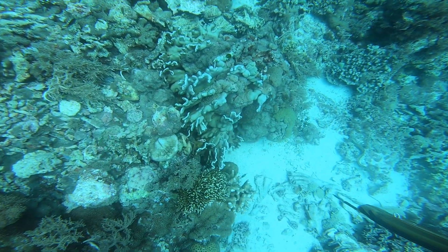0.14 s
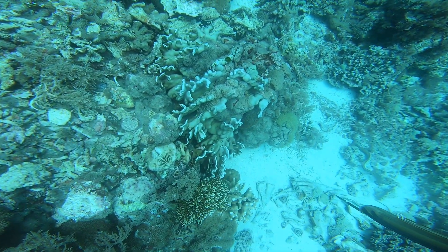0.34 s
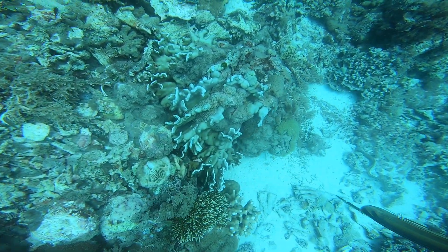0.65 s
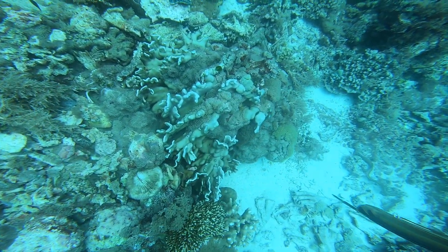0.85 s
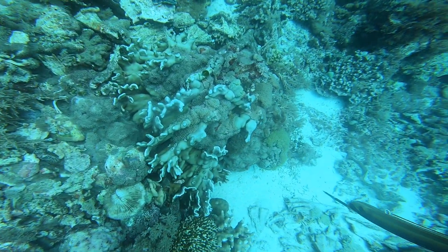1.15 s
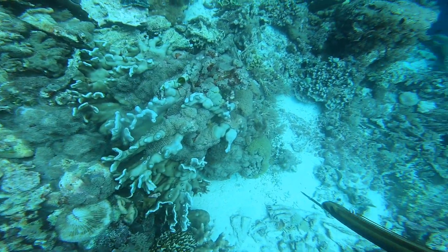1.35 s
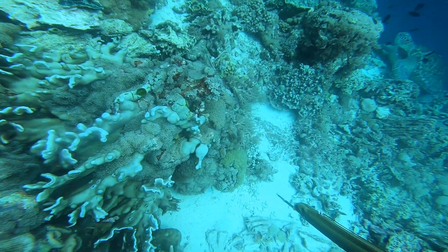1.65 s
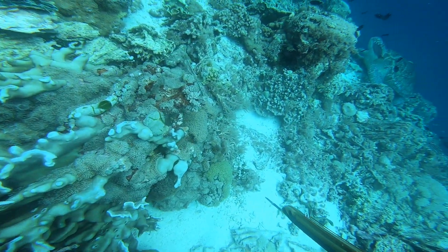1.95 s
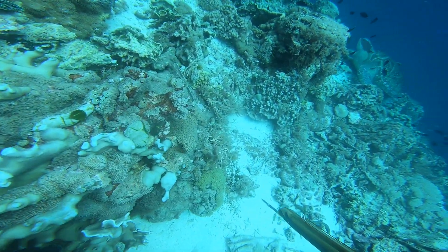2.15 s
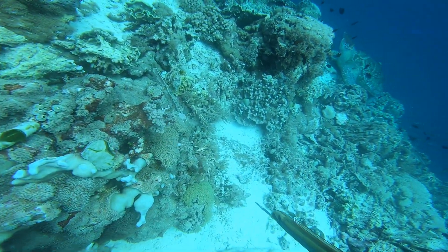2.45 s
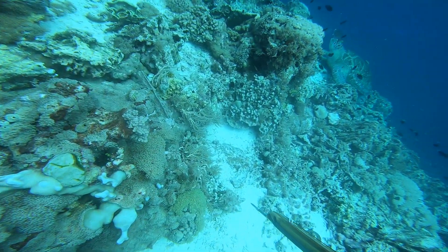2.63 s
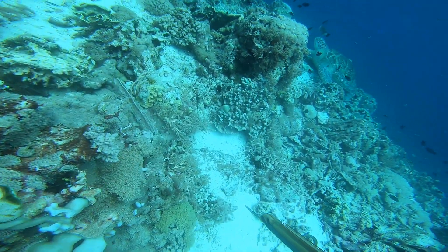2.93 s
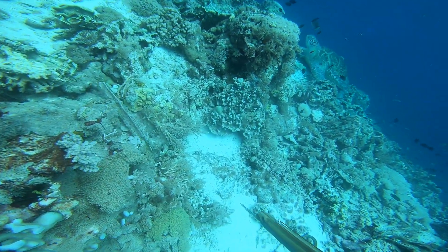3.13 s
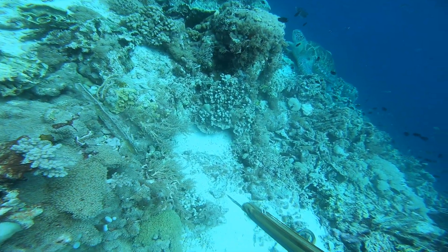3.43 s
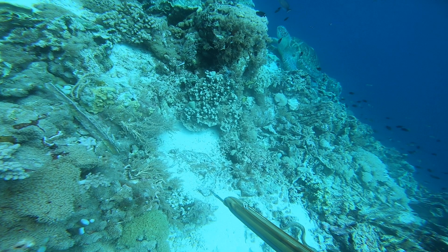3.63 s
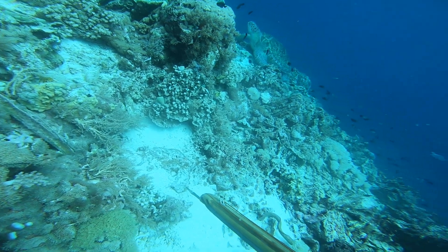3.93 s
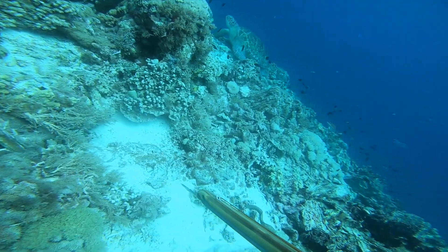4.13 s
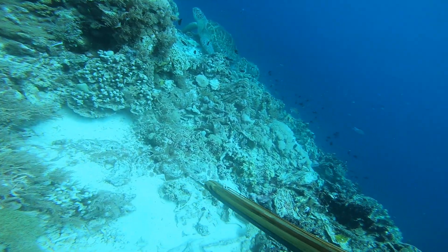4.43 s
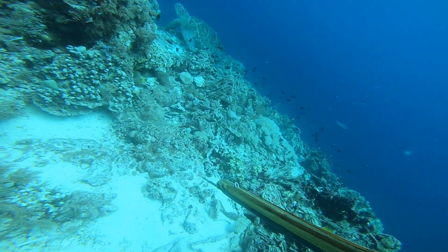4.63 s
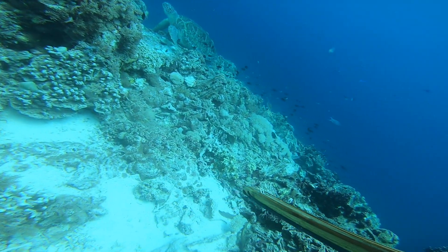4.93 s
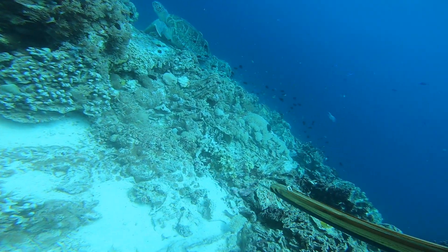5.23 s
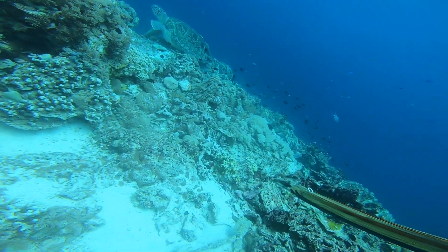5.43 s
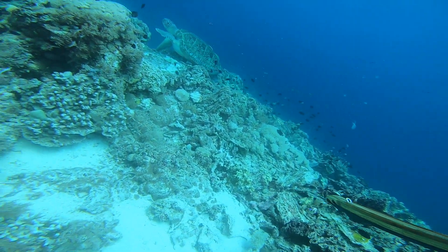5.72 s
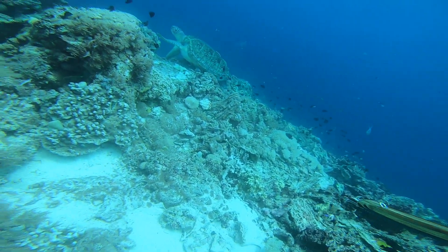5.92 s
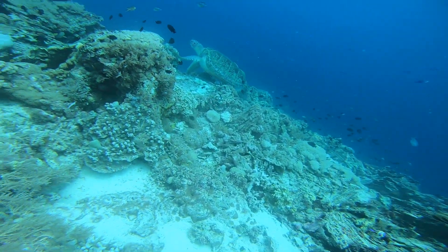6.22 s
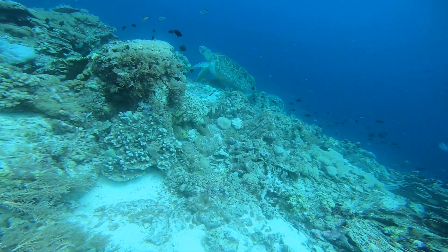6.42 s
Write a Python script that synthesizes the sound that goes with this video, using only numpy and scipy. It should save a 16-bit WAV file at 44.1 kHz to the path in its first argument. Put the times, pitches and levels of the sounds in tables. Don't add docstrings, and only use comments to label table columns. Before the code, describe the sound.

Underwater over a coral reef, dense sharp clicks and crackles pop constantly above a low, soft rumble of moving water.

```python
import sys
import numpy as np
from scipy import signal
from scipy.fft import rfft, irfft, next_fast_len
from scipy.io import wavfile
from scipy.ndimage import uniform_filter1d

SR = 44100
rng = np.random.default_rng(int(sys.argv[2]) if len(sys.argv) > 2 else 0)


def undo_db(level):
    steps = np.asarray(level, float) / 20
    return 10 ** steps


def master_out(mix):
    frames = np.transpose(np.atleast_2d(mix))
    ceiling = np.clip(frames, -1, 1)
    pcm = np.round(ceiling * 32767).astype(np.int16)
    wavfile.write(sys.argv[1], SR, pcm)


N = 289737

# t/s, peak level at 2
# kHz/dB, relative level near 3, 5 and 9 kHz/dB
LOUD_SNAPS = [(0.0107, -23.5, -9.5, -0.5, -13), (0.203, -24, -13, -23, -11), (0.2058, -28, -21, -23, -24),
              (0.2141, -25, -8, 1, -16), (0.4993, -18.5, -10.5, -7, -7.5), (0.9912, -22.5, -24, -0.5, -20),
              (0.9949, -18.5, -16, -4.5, -13), (1.0256, -18.5, -13, -14, -11.5),
              (1.0307, -19.5, -17, -8.5, -8.5), (1.201, -31.5, -20, 5, 9.5), (1.248, -11.5, -14, -15, -12),
              (1.5191, -31, -12, 4, 5.5), (1.891, -18.5, -42, -21, -10), (1.896, -14.5, -43, -8.5, -13.5),
              (2.0873, -25.5, -1, 1, 11.5), (2.7404, -26, -4.5, 5, 12.5), (3.4778, -20, 1, 0, -7.5),
              (3.4875, -30, -4, 5.5, 2), (4.8795, -27, -0.5, 4, -38), (5.246, -18.5, -11, -6, -41),
              (5.2556, -22.5, -11, -1, -35), (5.628, -16.5, -5, -6.5, -1), (5.7957, -27, -0.5, 8.5, -21),
              (6.4737, -23, 3.5, 5.5, 2)]
LOUD_LEAN_DB = [1.5, 0.1, 0.1, -3, 9, -1, 0, 0.1, 2, -2, -2, 4, 4.5, 18, 6, 6, -1.5, -4, -3, -6, -10, 13,
                -6, -5]
# t/s, peak
# level at 2 kHz/dB, relative level near 3 kHz/dB, near 5 kHz/dB
LARGE_CLAWS = [(0.017, -27.5, -25, -10), (0.0831, -31.5, -7, -9), (0.1985, -33, -4, -3),
               (0.352, -31, -4, -17), (0.4083, -32, -11, -28), (0.6077, -40.5, 14, -1),
               (0.6644, -33.5, -11, 3), (0.7824, -33, -3.5, -11), (0.982, -30, -14, -2),
               (1.083, -28.5, -6, 1.5), (1.2436, -27.5, -10, -20), (1.3304, -34.5, 7.5, -3),
               (1.747, -32, -11, 3), (1.866, -30, -13, 1.5), (3.316, -32, -18, 0.5),
               (3.4623, -29.5, -7, -5), (3.5318, -35, -8, 4), (3.9089, -24, -22, -22),
               (4.1995, -30, -24, 4.5), (4.2482, -31.5, -12, 7.5), (4.35, -32.5, -7, -17),
               (4.716, -30.5, -10, 1.5), (4.8739, -32, -2, -3), (5.0446, -32, -7, 4),
               (5.375, -28, -13, -19), (5.6665, -26.5, -10, -1), (5.8053, -32, -4, 12),
               (5.8732, -29, -3, 6), (6.4537, -29, -16, -5), (6.483, -25.5, -19, 1)]
# t/s, peak level at 2 kHz/dB, brightness near 5 and 9 kHz/dB
SMALL_CLAWS = [(0.03, -40, 9.5), (0.2799, -41, 4), (0.552, -40, 5.5), (0.5874, -44, 10), (1.3506, -45, 9),
               (1.3723, -32, 1.5), (2.1689, -34, -1), (2.293, -43, -1), (2.5024, -40, 6.5),
               (2.637, -33, -0.5), (3.022, -50.5, 14), (3.23, -38.5, 4), (3.509, -40, 4), (3.93, -45.5, 12),
               (4.119, -33, 3.5), (4.155, -42, 4), (4.4438, -35.5, 6.5), (4.5445, -38, 2),
               (4.661, -40.5, 2.5), (4.784, -39, 9), (5.2822, -38.5, 5), (5.471, -39.5, 7),
               (5.638, -36, -2), (5.8637, -31, 1.5), (6.042, -50, 13), (6.093, -55, 16),
               (6.1159, -47, 13.5), (6.2422, -46, 13.5), (6.3503, -30, 0), (6.5622, -32.5, 4.5),
               (0.7551, -50, 10.5), (1.2887, -40, 0), (1.5727, -32, -4), (2.5256, -33.5, -0.5),
         (2.8868, -35.5, -1), (3.2741, -40, -4), (3.3486, -49, 12.5), (3.7522, -43, 5), (3.981, -40.5, 4.5),
         (4.9897, -42, 1), (5.2982, -39, 1), (5.4621, -34, -1), (5.8259, -39.5, 2), (6.2288, -45.5, 10)]
# t/s, peak level at 2 kHz/dB, brightness near 5 kHz/dB
LESSER_SNAPS = [(0.1016, -38, -5), (0.1216, -35.5, -1.5), (0.1589, -32, -10), (0.2372, -38, 1),
                (0.3296, -31.5, 0.5), (0.345, -45, -5), (0.3844, -31, -8), (0.4393, -31, -8),
                (0.5352, -49, 16), (0.6515, -49, 16), (0.6958, -34, -2), (0.737, -34.5, -8), (0.7718, -35, 3),
                (0.7876, -35, -3), (0.8461, -37, -16), (0.874, -46.5, 13), (0.9114, -45.5, 15.5),
                (1.0052, -35, 2), (1.0722, -37, -12), (1.1113, -37, 4), (1.1513, -48, 11), (1.1819, -32, -8),
                (1.3078, -38.5, 3.5), (1.3436, -38, 1), (1.3935, -37.5, 2), (1.4573, -48, 15),
                (1.4799, -38.5, 1), (1.5569, -48, 11), (1.7296, -38, 2), (1.7853, -35, -11),
                (1.7919, -38, 2.5), (1.9255, -37.5, 4), (1.9466, -37, -2), (1.9655, -33.5, 1),
                (1.9896, -48, 10), (2.0228, -42.5, 10), (2.0394, -55, 19), (2.1032, -40, -5),
                (2.2114, -50.5, 18.5), (2.2405, -35.5, 2), (2.2673, -33, -11), (2.2964, -35, 2.5),
                (2.3398, -33, -2), (2.6088, -33, -3), (2.7479, -35, 0), (2.7926, -47.5, 14),
                (2.8551, -36, -10), (2.9691, -34.5, -3), (3.0005, -42.5, 8), (3.0668, -42, 4),
                (3.1042, -40.5, 8.5), (3.311, -32, -5), (3.5244, -38, -7),
                (3.7399, -34, -3), (3.7576, -40.5, 6.5), (3.8761, -30, -2.5), (4.1458, -56.5, 24),
               (4.4244, -37, 3), (4.6402, -36.5, 4), (4.9742, -36, 0), (5.01, -31, -5), (5.2271, -36, -8),
               (5.2906, -38, 5), (5.4311, -36.5, 3), (5.5375, -39, -3), (5.5524, -41, -2), (5.5585, -41, 9),
               (5.5744, -28, -9), (5.6576, -34, 1), (5.818, -32, -4), (6.0173, -39, 5), (6.1222, -47, 7),
               (6.2759, -43, 12), (6.28, -32, -2.5), (6.4445, -38, 3), (6.5559, -34, 0)]
# t/s, peak level at 2 kHz/dB, relative level near 5 and 9 kHz/dB
STRAY_SNAPS = [(0.1805, -42.5, 1, 5), (0.3588, -33, -10, -6), (0.4738, -38.5, -6, -10),
               (0.6156, -44, 7, -4), (0.7995, -38, 0, 1), (1.195, -45, 6, 0), (1.3257, -36, -3, -8),
               (1.6129, -49.5, 9, -3), (2.5648, -47, 4, 8), (3.0124, -44, 2, 9), (3.0955, -27.5, -6, -7),
               (3.218, -46, 0, 8), (3.2416, -36, 4, 5), (3.4291, -42.5, 5, -21), (3.5697, -46, 4, 11),
               (4.8953, -38, 1, -15), (5.1595, -54, 6, 16), (5.6183, -50, 8, 16), (5.689, -40, 5, -1),
               (5.8852, -37, 5, -12), (6.34, -42, 5, 8), (6.4331, -48, 4, 17), (1.8644, -42, 6, 5)]
# f/Hz, width/Hz, level/dB
HOUSING = [
    [(1850, 135, -2), (2220, 400, 13.5), (2550, 75, 8)],
    [(3210, 380, 17)],
    [(4010, 210, -1), (5120, 1010, 8), (5900, 280, 11)],
    [(6890, 1450, 2.5), (8680, 720, -0.5), (9550, 1700, -9), (14230, 4000, 2.5)],
    [(886, 70, -9.5), (1157, 89, -6.5), (1314, 42, 18.5)],
]
# lower f/Hz, upper f/Hz
REGION_HZ = [
    (1300, 2480),
    (2490, 3980),
    (3980, 5346),
    (6380, 11340),
    (720, 988),
]
# f/Hz, width/Hz
HOUSING_NULLS = [(1460, 168), (2800, 164), (3700, 61), (6850, 310), (8000, 280)]
# t/s, peak level/dB, f/Hz, length/ms, relative level of the low thump/dB
POPS = [(0.463, -31.5, 402, 4.2, -9.5), (1.137, -31.5, 396, 4.8, -15), (1.748, -44.5, 214, 10.5, -25),
        (1.767, -24.5, 377, 7.3, -18), (2.238, -34.5, 407, 4, -8.5), (2.521, -34.5, 360, 4.4, -9),
        (2.825, -35.5, 371.5, 4.6, -12), (2.881, -27, 428, 4.4, -17), (3.181, -35, 447, 6.6, -4),
        (3.881, -37, 420, 5.7, -18), (4.101, -39.5, 370, 8.4, 0), (4.176, -35, 430, 4, -16),
        (4.351, -38.5, 546, 3.9, -7), (4.413, -37, 381, 7.9, -10), (4.488, -35, 418, 6.1, -9),
        (4.696, -39.5, 397, 4.9, -15), (4.786, -33.5, 405, 5.4, -35), (5.423, -38, 424, 4.4, -21),
        (5.486, -31, 445, 5.4, -4), (5.541, -30, 440, 4.1, -2), (5.6, -31, 450, 5.3, -0.5),
        (5.673, -33, 453, 4.5, -34), (5.719, -32.5, 450, 4.5, -2.5), (6.122, -39, 470, 11, -10)]
# t/s, peak level/dB, f/Hz
FAR_POPS = [(0.22, -43.5, 372), (0.305, -43, 330), (0.439, -43.5, 400), (0.929, -49, 432),
            (1.095, -43, 400), (1.173, -49, 382), (1.222, -48, 345), (1.475, -47, 420), (1.741, -47, 720),
            (1.761, -35.5, 220), (1.782, -37, 440), (2.545, -39, 480), (3.861, -53, 397), (4.077, -40, 684),
            (4.758, -50, 406), (5.338, -40, 385), (5.366, -44, 409), (5.377, -46, 486), (5.403, -47, 410),
            (5.464, -39, 390), (5.501, -37, 430), (5.575, -50, 440), (5.803, -39, 456), (5.935, -38, 456),
            (6.387, -40.5, 479)]
# t/s, peak level/dB, middle f/Hz, length/ms
CROAKS = [(0.2705, -41.5, 1660, 5.1), (0.4909, -42.5, 1350, 6.5), (0.743, -47.5, 1335, 6.6),
          (0.9382, -37.5, 1485, 6.1), (0.9652, -43, 1780, 7.7), (1.133, -47.5, 1304, 8.3),
          (1.1753, -44, 1670, 8.2), (1.43, -48, 1353, 6.4), (1.71, -46, 1454, 7.9),
          (1.7564, -33, 1370, 1.4), (1.82, -48, 1590, 8.4), (1.9863, -47, 1735, 8.9),
          (2.3651, -48, 1300, 2.5), (2.623, -43, 1494, 9), (3.0969, -40.5, 1915, 5.5),
          (3.216, -36.5, 1395, 5.4), (3.231, -42.5, 1420, 12.5), (3.243, -35, 1690, 4),
          (3.2578, -35.5, 1410, 5.4), (3.4323, -35, 1674, 2.3), (3.5643, -36.5, 1460, 4.9),
          (3.623, -43.5, 1393, 8), (3.8811, -46, 1434, 6.6), (4.064, -45.5, 1280, 5.3),
          (4.2219, -35.5, 1480, 2), (5.701, -37.5, 1376, 4.4), (5.883, -40.5, 1292, 9.7),
          (5.942, -46, 1034, 8.3), (5.9838, -41.5, 1300, 9.8), (6.1764, -39, 1326, 4.6)]
# t/s, middle f/Hz
FAR_CROAKS = [(0.1143, 1283), (2.1947, 1570), (2.419, 1594), (3.8107, 1350), (4.2083, 1530), (4.9115, 1300),
              (6.266, 1825), (0.2243, 1410), (1.0642, 1390), (2.387, 1250), (3.1423, 1450), (3.448, 1514),
              (6.2427, 1255), (6.4001, 1250), (4.964, 1376), (5.851, 1300)]
# t/s, peak level/dB, f/Hz, 60 dB decay time/s
BUBBLE_JOLTS = [
    (3.5738, -33.5, 2150, 0.049),
    (3.5815, -32.5, 2120, 0.044),
    (4.067, -28, 2160, 0.02),
]
# t/s, peak level/dB
EDDIES = [(2.323, -32.5), (2.466, -30), (2.533, -28.5), (2.555, -31.5), (2.578, -32), (2.691, -28),
          (2.915, -33.5), (3.094, -34.5), (3.888, -36.5), (5.136, -34), (5.273, -33.5), (5.562, -30),
          (6.023, -35), (6.115, -32.5)]
# t/s, right port level/dB, left port level/dB
SURGE = [(0.0, -49, -50), (0.55, -48, -46), (1.2, -47, -53.5), (1.8, -48, -44), (2.3, -42.5, -44.5),
         (2.6, -42.5, -46), (2.86, -44.5, -42.5), (3.12, -48, -42), (3.5, -44, -43), (3.9, -49, -39),
         (4.2, -45, -42), (4.7, -47.5, -41.5), (5.1, -43.5, -39.5), (5.46, -43.5, -39), (5.72, -45.5, -40),
         (5.98, -47.5, -37), (6.3, -43.5, -42), (6.57, -47, -39.5)]
# f/Hz, level/dB
RIGHT_RUMBLE = [(15, 6), (45, -0.5), (90, -17), (150, -12.5), (260, -27), (600, -46.5), (1200, -39.5),
                (2500, -27), (5000, -110)]
# f/Hz, level/dB
LEFT_RUMBLE = [(15, 3.5), (45, -6), (90, -14.5), (150, -13.5), (300, -29), (600, -36), (1200, -40.5),
               (2500, -36), (5000, -110)]
# t/s, level/dB
WALL = [(0.0, -55), (0.8, -56.5), (1.25, -53.5), (1.7, -59.5), (2.45, -57), (2.9, -59), (3.3, -56),
        (4.1, -56.5), (4.9, -59), (5.4, -56), (6.3, -54.5), (6.56, -57)]
FAR_REGION_DB = [2.5, -4.5, -1, -2.5, -6]
# f/Hz, level/dB
LEFT_PORT = [(100, -24), (300, -11.5), (420, -8), (700, -1.5), (3000, -0.5), (3700, -4), (4300, -6.5),
             (5000, -29.5)]
# t/s, goal (1 = separate ports, 0 = shared), glide time constant/s
MIXER = [
    (1.775, 1, 0.3),
    (4.21, 0, 0.3),
    (4.71, 1, 0.2),
]


def snap_rows():
    large = [(s, db, dip, bright, -9.5 + 0.89 * bright) for s, db, dip, bright in LARGE_CLAWS]
    small = [(s, db, -8, bright, 4 + bright) for s, db, bright in SMALL_CLAWS]
    lesser = [(s, db - 1, -10.5, bright, bright - 6) for s, db, bright in LESSER_SNAPS]
    stray = [(s, db, -10.5, bright, top) for s, db, bright, top in STRAY_SNAPS]
    return np.array([*LOUD_SNAPS, *large, *small, *lesser, *stray])


def near_snaps(low_db, scatter_db, spray_db, spray_ms):
    rows, out = snap_rows(), np.zeros(N)
    at = (rows[:, 0] * SR).astype(int)
    levels = rows[:, 1:2] + np.c_[0 * at, rows[:, 2:], low_db + 0 * at]
    luck = np.resize(rng.standard_normal((181, 21)), (len(rows), 21))
    sign = np.sign(luck[:, -1])
    luck[len(LOUD_SNAPS):] *= 2.6
    rustle = rng.standard_normal(N)
    echoes = np.tanh(rustle) * (rng.random(N) < .035)
    lean_db = np.pad(LOUD_LEAN_DB, (0, len(rows) - len(LOUD_LEAN_DB)))
    spray_fade = np.exp(-1000 / (spray_ms * SR))
    lead_ms, path_spread_ms = 1.65, .25
    lead_fade = np.exp(-1000 / (lead_ms * SR))
    unit = np.eye(1, 400)[0]
    for region, modes in enumerate(HOUSING):
        response = sum(undo_db(db) * resonate(unit, hz, width) for hz, width, db in modes)
        strength = undo_db(levels[:, region]) / np.abs(push(response, region)).max()
        lag = (region > 0) * np.tanh(luck[:, -1 - region]) * path_spread_ms * SR / 1000
        reach = at + lag.astype(int)
        heights = np.zeros(N)
        heights[reach] = strength
        decay = signal.lfilter([0, 1], [1, -spray_fade], heights + 1e-18)
        spray = undo_db(spray_db + 2.8 * (region == 3)) * echoes * decay
        if region in (0, 3, 4):
            lead = signal.lfilter([0, 1], [1, -lead_fade], heights[::-1] + 1e-18)[::-1]
            spray += undo_db(-31.5) * rustle * lead
        rung = 0
        for k, (hz, width, db) in enumerate(modes):
            mode_db = scatter_db * luck[:, 4 * region + k] + (region == 2) * (k - 1.5) * lean_db
            clicks = spray.copy()
            clicks[reach] = sign * strength * undo_db(mode_db)
            rung = rung + undo_db(db) * resonate(clicks, hz, width)
        out += push(rung, region)
    return out


def fish_pops():
    out = np.zeros(N + 4000)
    t = (np.arange(4000) - 1000) / SR
    far_ms, far_thump_db = 5.2, -15
    pops = [*POPS, *[(s, db, hz, far_ms, far_thump_db) for s, db, hz in FAR_POPS]]
    phases = rng.uniform(0, 2 * np.pi, len(pops))
    for (s, db, hz, ms, thump_db), phase in zip(pops, phases):
        age = (t + ms / 4000) / (ms / 1000)
        rise = np.exp(-.5 * (age / 0.31) ** 2)
        fall = 1 / np.cosh(np.minimum(age / 0.62, 30))
        swell = np.where(age < 0, rise, fall)
        turn = 2 * np.pi * hz * t + phase
        pop = swell * np.sin(turn) + undo_db(-13.5) * swell ** 2 * np.sin(1.77 * turn)
        thump_width = np.where(t < .006, 0.0045, 0.008)
        thump_swell = np.exp(-.5 * ((t - .006) / thump_width) ** 2)
        thump = undo_db(thump_db - 1.5) * thump_swell * np.sin(2 * np.pi * 165 * t + phase)
        start = int(s * SR) - 1000
        out[start:start + 4000] += undo_db(db) * (pop + thump)
    roughness = rms_one(resonate(rng.standard_normal(N), 60, 100))
    return out[:N] * (1 + 0.25 * roughness)


def fish_croaks(sweep, tail_db):
    out = np.zeros(N + 1500)
    t = (np.arange(1500) - 500) / SR
    far_db, far_ms = -48, 5.1
    calls = [*CROAKS, *[(s, far_db, hz, far_ms) for s, hz in FAR_CROAKS]]
    phases = np.resize(rng.uniform(0, 2 * np.pi, len(CROAKS)), len(calls))
    for (s, db, middle_hz, ms), phase in zip(calls, phases):
        spread = ms / 1000 * np.where(t < 0, .25, .4)
        swell = np.exp(-.5 * (t / spread) ** 2)
        hz = middle_hz * (1 - sweep * np.tanh(t * 2000 / ms))
        start = int(s * SR) - 500
        out[start:start + 1500] += undo_db(db) * swell * np.sin(2 * np.pi * np.cumsum(hz) / SR + phase)
    rough = out[:N] * (1 + 1.17 * rms_one(resonate(rng.standard_normal(N), 274, 135)))
    rough = signal.sosfilt(signal.butter(3, 850, "high", fs=SR, output="sos"), rough + 1e-18)
    low_modes = [*HOUSING[-1], *HOUSING[0]]
    return rough + undo_db(tail_db) * sum(resonate(rough, hz, width) for hz, width, db in low_modes)


def bubble():
    out, t = np.zeros(N), np.arange(3000) / SR
    for s, db, hz, t60 in BUBBLE_JOLTS:
        onset = np.minimum(t / .001, 1)
        out[int(s * SR):][:3000] += undo_db(db - 60 * t / t60) * onset * np.sin(2 * np.pi * hz * t)
    return out


def slaps():
    out, t = np.zeros(N), (np.arange(6000) - 3000) / SR
    swing_hz, swing_s, churn_s = 46.7, 0.0074, 0.023
    churn_db, froth_db = -23.5, -40.5
    phases = rng.uniform(0, 2 * np.pi, len(EDDIES))
    rough = rms_one(resonate(resonate(rng.standard_normal(N), 160, 114), 160, 114))
    froth = undo_db(8.7 * drift(22)) * rms_one(resonate(rng.standard_normal(N), 405, 500))
    rough += undo_db(froth_db - churn_db) * froth
    for (s, db), phase in zip(EDDIES, phases):
        span = slice(int(s * SR) - 3000, int(s * SR) + 3000)
        swing = np.exp(-.5 * (t / swing_s) ** 2) * np.cos(2 * np.pi * swing_hz * t + phase)
        churn = np.exp(-.5 * (t / churn_s) ** 2) * rough[span]
        out[span] += undo_db(db) * (swing + undo_db(churn_db) * churn)
    return out


def rumble(db, points, lumpy_db):
    white = rng.standard_normal(N)
    deep = signal.sosfilt(signal.butter(2, 50, "low", fs=SR, output="sos"), white)
    eddies = undo_db(lumpy_db * np.tanh(drift(4.6))) * (white - deep)
    return undo_db(db) * rms_one(colour(deep + eddies, points))


def far_crackle(mid_db, high_db, per_s, size_db, colour_db, smear_ms, blur_db):
    born = rng.random(N) < per_s * undo_db(4 * np.tanh(drift(25))) / SR
    sizes = born * undo_db(size_db * np.minimum(rng.exponential(1, N), 3))
    paths, out = rng.standard_normal((2, N)), np.zeros(N)
    fade = np.exp(-1000 / (smear_ms * SR))
    for region, modes in enumerate(HOUSING):
        coloured = np.minimum(sizes * undo_db(colour_db * rng.uniform(-1.6, 1.87, N)), undo_db(17.5))
        bursts = signal.lfilter([1], [1, -fade], coloured)
        strikes = rms_one(bursts * paths[0]) + undo_db(blur_db + 2.3 * drift(25)) * paths[1]
        rung = sum(undo_db(db) * resonate(strikes, hz, width) for hz, width, db in modes)
        level_db = high_db if region in (2, 3) else mid_db
        out += undo_db(FAR_REGION_DB[region] + level_db) * rms_one(push(rung, region))
    return out


def port_hum(db):
    lumps = undo_db(3.1 * drift(16.0)) * rng.standard_normal(N)
    return undo_db(db) * rms_one(resonate(resonate(lumps, 398, 198), 398, 198))


def self_hiss(db):
    return undo_db(db + 3.5 * drift(18)) * rms_one(resonate(rng.standard_normal(N), 15300, 3200))


def channel_hiss(db):
    band = signal.butter(3, [10500, 16000], "band", fs=SR, output="sos")
    hiss = signal.sosfilt(band, rng.standard_normal((2, N)))
    return undo_db(db + 6 * np.tanh(drift(15))) * rms_one(hiss)


def housing_colour(x):
    for hz, width in HOUSING_NULLS:
        x = x - .7 * resonate(x, hz, width)
    return signal.sosfilt(signal.butter(3, 10500, "low", fs=SR, output="sos"), x)


def mixer_split():
    t, split = np.arange(N) / SR, np.zeros(N)
    for s, goal, glide_s in MIXER:
        i = int(s * SR)
        split[i:] = goal + (split[i] - goal) * np.exp(-(t[i:] - s) / glide_s)
    return split


def ragged_top(x):
    usual_edge_hz, band_hz, swing_hz = 14600, 350, 420
    burst_level, burst_s, around_s = .065, .007, .024
    spectrum, hz = rfft(x), np.arange(N // 2 + 1) * SR / N
    burst = 1. * (np.abs(irfft(spectrum[1] * (hz > 1500), N)) > burst_level)
    inside = uniform_filter1d(burst, size=int(burst_s * SR)) > 1e-6
    around = uniform_filter1d(burst, size=int(around_s * SR)) > 1e-6
    openness = drift(9) + np.where(inside, 5, np.where(around, -5, 0))
    for step in range(-9, 7):
        low_hz = usual_edge_hz + step * band_hz
        closed = openness + drift(20) < step * band_hz / swing_hz
        lost = uniform_filter1d(1. * closed, size=200)
        x = x - lost * irfft(spectrum * (hz > low_hz) * (hz <= low_hz + band_hz), N)
    return x


def push(x, region):
    return signal.sosfilt(signal.butter(2, REGION_HZ[region], "band", fs=SR, output="sos"), x + 1e-18)


def resonate(x, hz, width_hz):
    r = np.exp(-np.pi * width_hz / SR)
    zeros = np.array([1, 0, -1]) * (1 - r * r) / 2
    poles = [1, -2 * r * np.cos(2 * np.pi * hz / SR), r * r]
    return signal.lfilter(zeros, poles, x + 1e-18)


def colour(x, points, lag_ms=0.):
    size = next_fast_len(N + 4096)
    hz = np.maximum(np.arange(size // 2 + 1) * SR / size, 1)
    curve_hz, curve_db = np.transpose(points)
    db = np.interp(np.log(hz), np.log(curve_hz), curve_db)
    delay = np.exp(-2j * np.pi * hz * lag_ms / 1000)
    return irfft(rfft(x, size) * undo_db(db) * delay, size)[:N]


def drift(rate):
    r = np.exp(-80 * np.pi * rate / SR)
    slow = signal.lfilter([1], [1, -2 * r, r * r], rng.standard_normal(N // 40 + 2002))[2000:]
    return np.interp(np.arange(N) / 40, np.arange(len(slow)), rms_one(slow))


def rms_one(x):
    return x / np.sqrt(np.mean(x ** 2) + 1e-20)


def in_time(rows):
    s, *columns = np.transpose(rows)
    return [np.interp(np.arange(N) / SR, s, c) for c in columns]


def scene():
    mid_db, = in_time(WALL)
    right_db, left_db = in_time(SURGE)
    high_db = -58 + 0.42 * (mid_db - mid_db.mean())
    hum_db = -59.5 + 0.68 * (left_db - left_db.mean())
    reef = near_snaps(low_db=-27, scatter_db=1.2, spray_db=-13.5, spray_ms=5.5)
    reef += far_crackle(mid_db - 2.5, high_db, per_s=450, size_db=3.5, colour_db=8.0,
                        smear_ms=1.0, blur_db=-5.5)
    reef += fish_croaks(sweep=0.2944, tail_db=1.0) + bubble()
    right = housing_colour(reef + self_hiss(-67.5)) + fish_pops() + port_hum(hum_db)
    left = -colour(right, LEFT_PORT, lag_ms=0.082)
    right_water = rumble(right_db, RIGHT_RUMBLE, lumpy_db=5.0)
    left_water = rumble(left_db - 1.5, LEFT_RUMBLE, lumpy_db=4.0) + slaps()
    shared = right + 0.83 * left + right_water
    ports = np.array([left + left_water, right + right_water])
    split = mixer_split()
    return (1 - split) * shared + split * ports


def roll_off(x):
    return signal.sosfilt(signal.butter(12, 16490, fs=SR, output="sos"), x)


def record(dry):
    high_pass = signal.butter(1, 12, "high", fs=SR, output="sos")
    wired = signal.sosfilt(high_pass, dry) + channel_hiss(-89.0)
    return roll_off(ragged_top(wired))


dry = scene()
out = record(dry)
master_out(out)
```